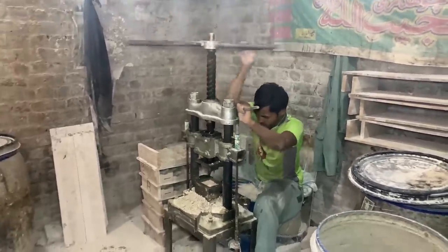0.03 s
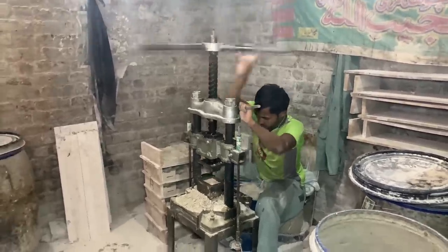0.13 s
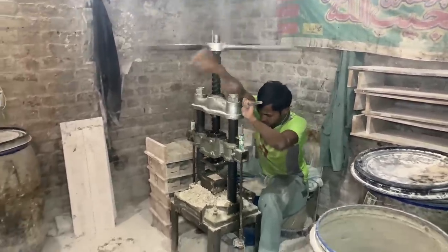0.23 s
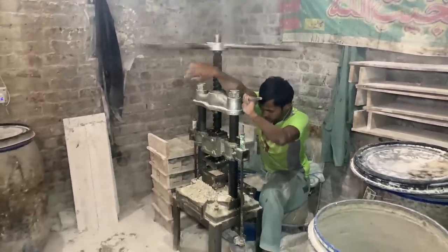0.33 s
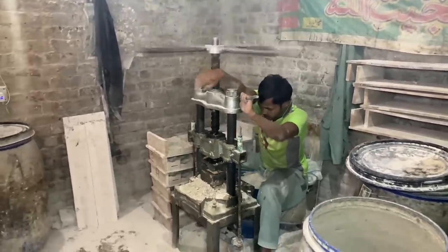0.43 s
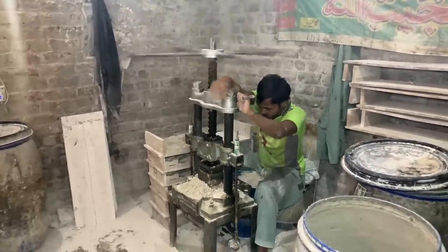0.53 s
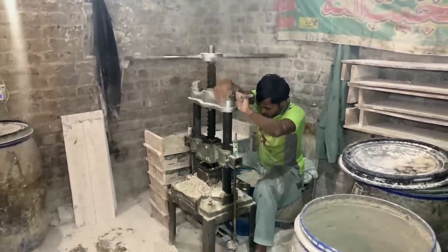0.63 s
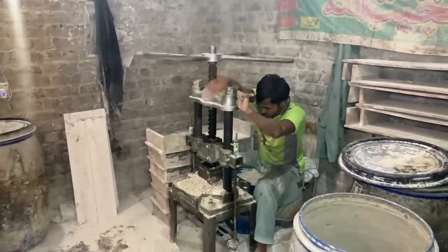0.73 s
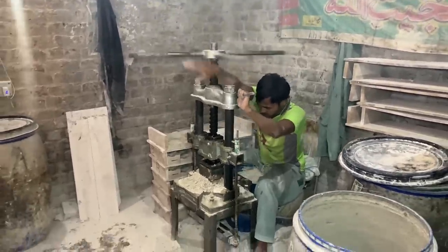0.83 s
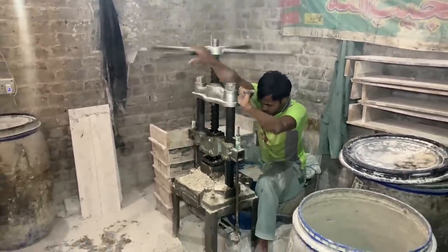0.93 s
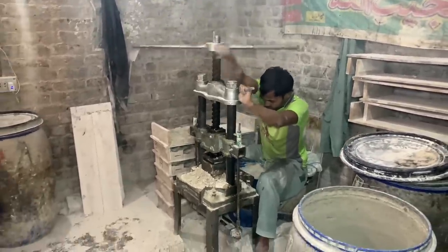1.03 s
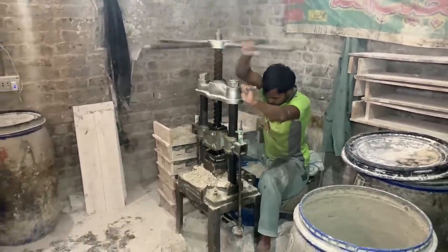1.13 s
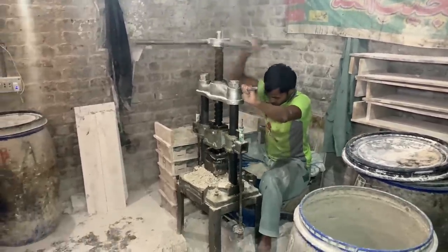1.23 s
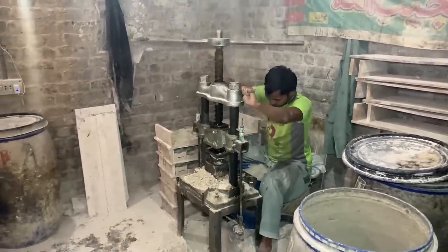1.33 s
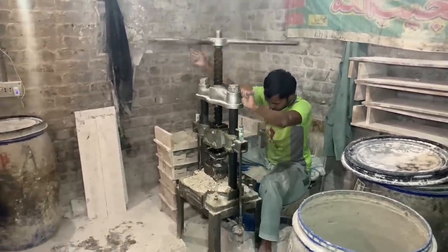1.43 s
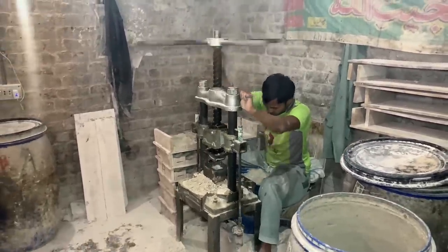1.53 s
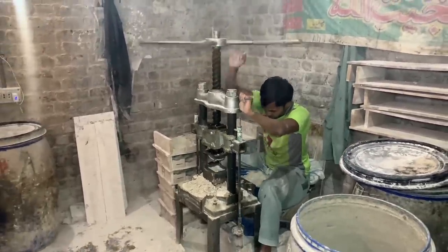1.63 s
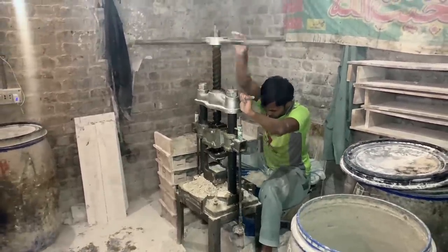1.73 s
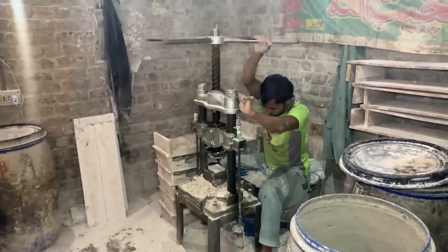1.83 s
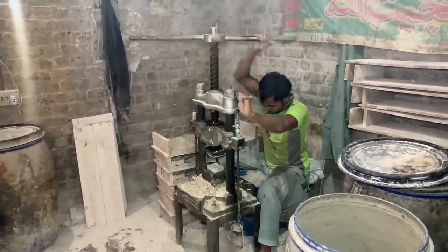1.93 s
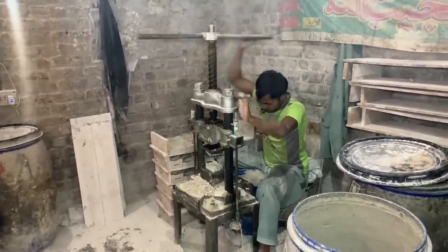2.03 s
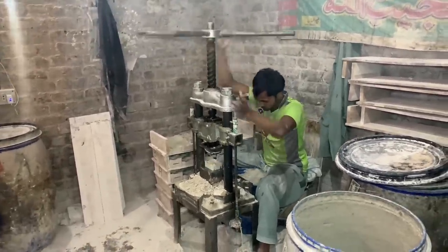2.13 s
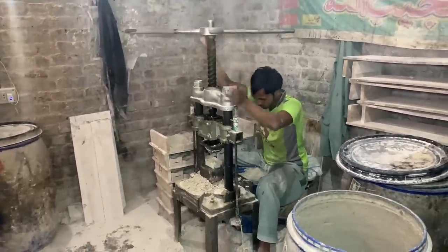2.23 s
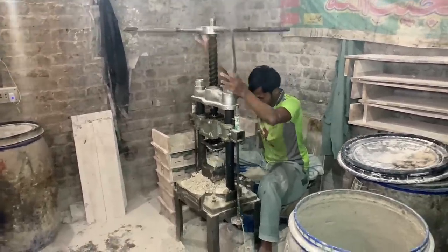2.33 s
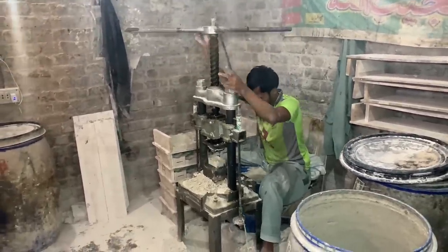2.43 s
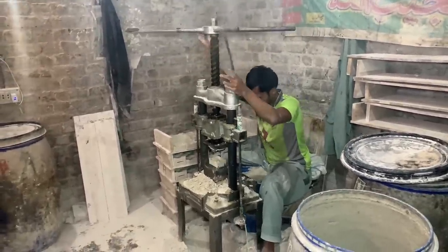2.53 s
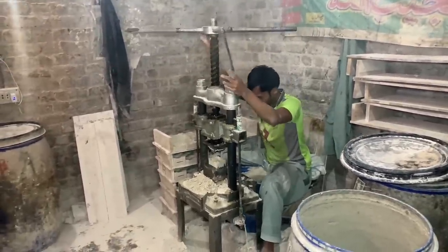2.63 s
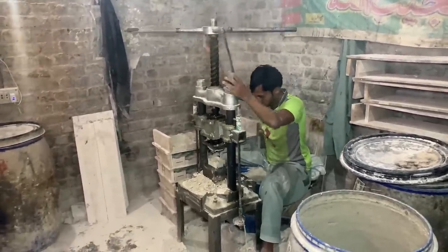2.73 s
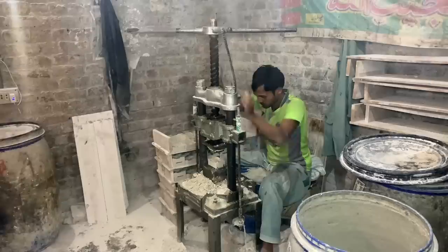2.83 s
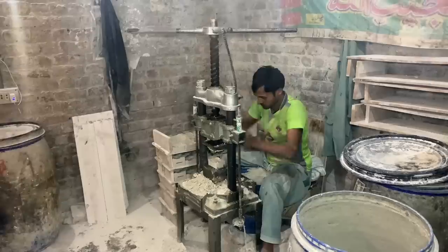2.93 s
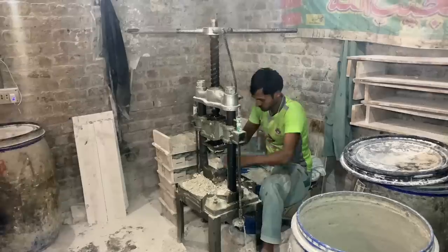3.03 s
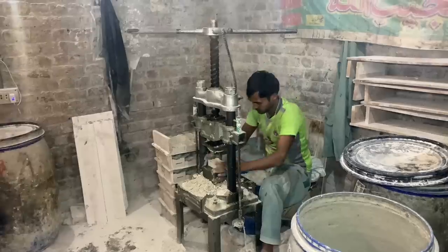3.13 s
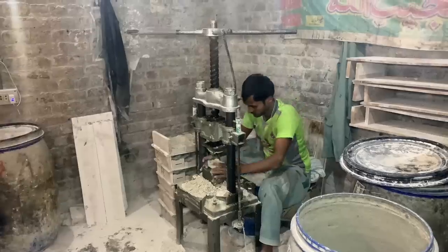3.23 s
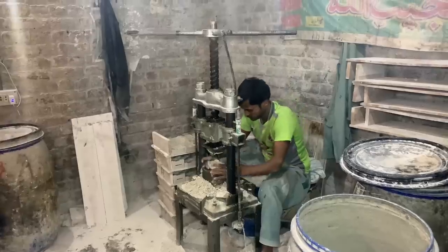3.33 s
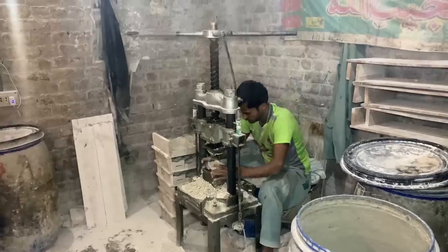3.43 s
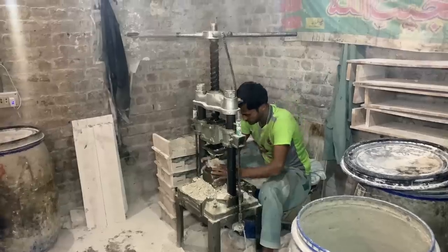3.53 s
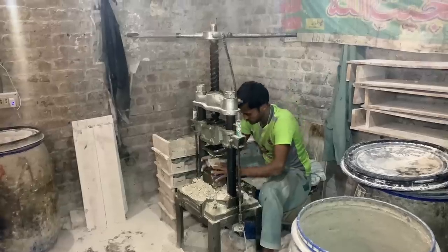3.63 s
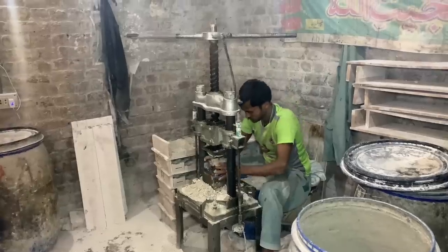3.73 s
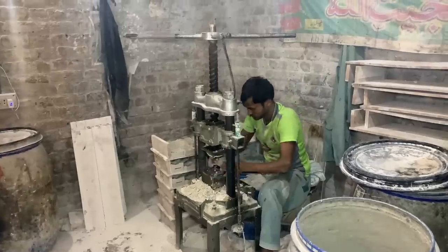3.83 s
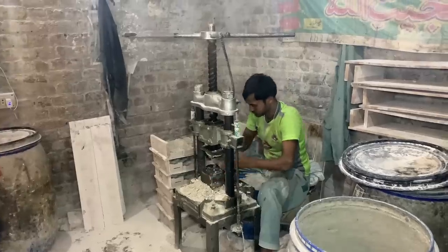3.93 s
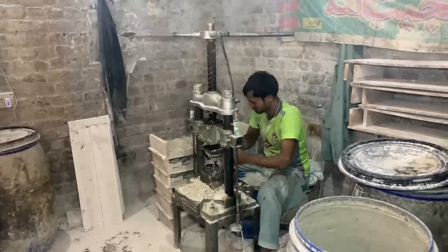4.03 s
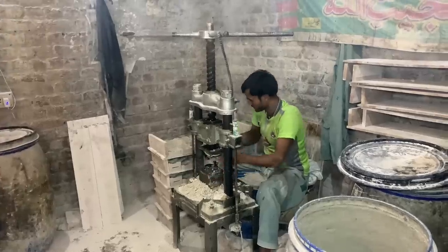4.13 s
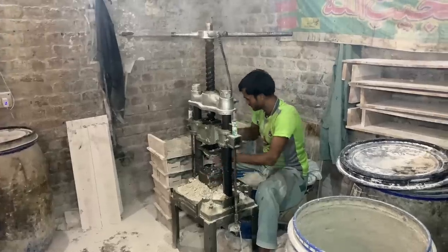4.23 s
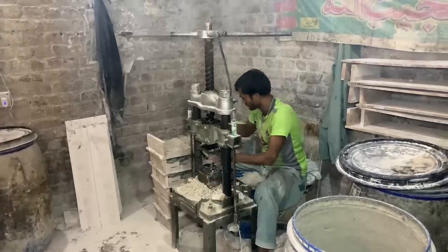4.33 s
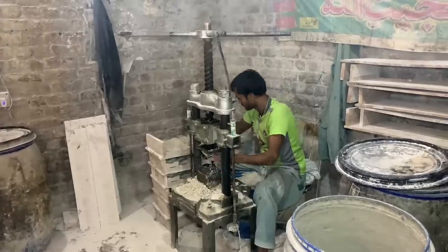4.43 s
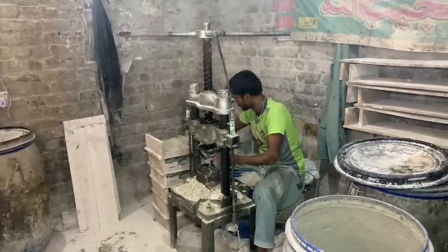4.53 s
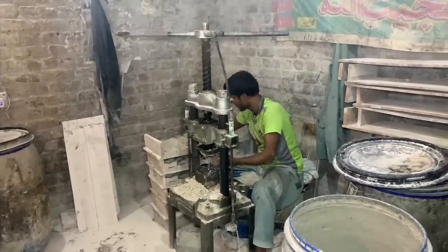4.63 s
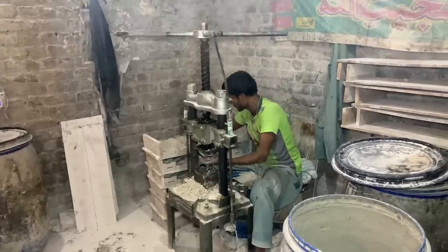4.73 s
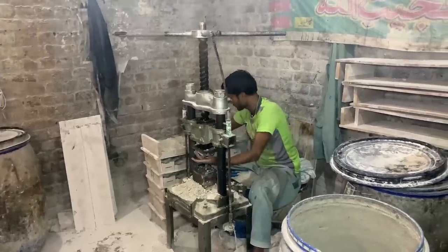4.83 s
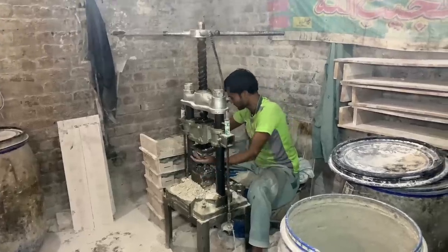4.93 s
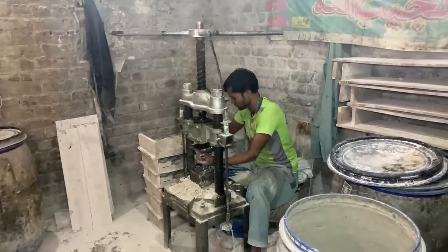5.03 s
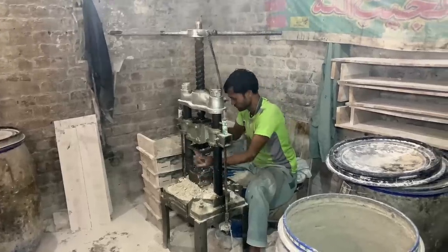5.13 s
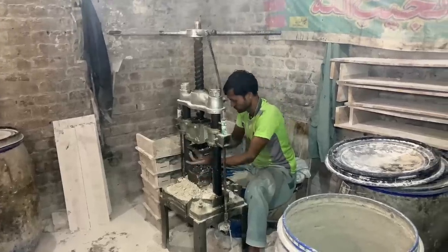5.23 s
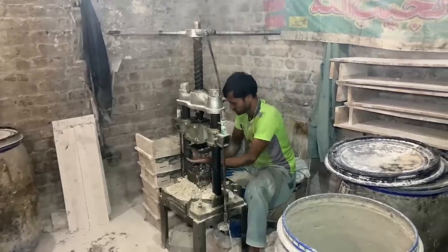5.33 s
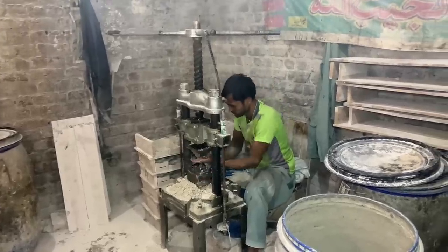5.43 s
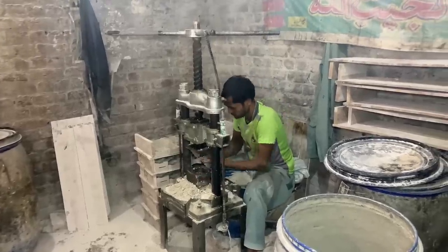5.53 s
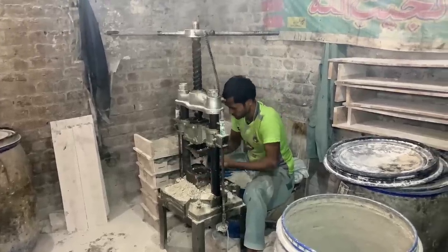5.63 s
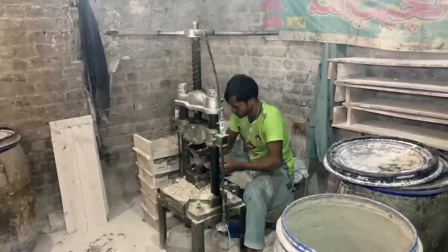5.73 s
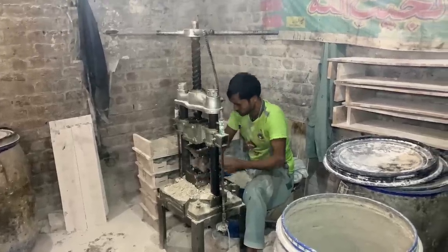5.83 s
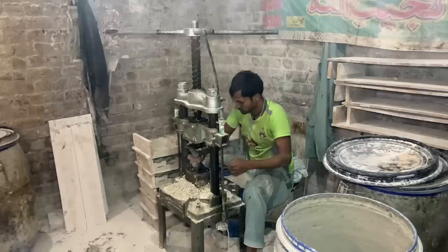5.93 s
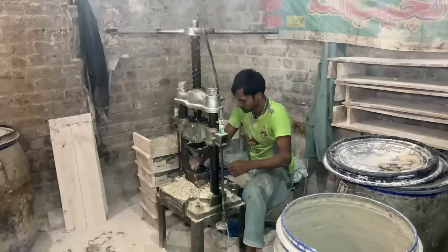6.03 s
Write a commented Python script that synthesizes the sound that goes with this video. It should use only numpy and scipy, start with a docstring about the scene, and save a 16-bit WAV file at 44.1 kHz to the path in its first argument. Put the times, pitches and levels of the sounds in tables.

```python
"""Small brick workshop with a hand screw press: the ram slams down and rattles in its frame, a steel stay rod
clinks against the fly bar, a second, duller knock shakes the bench, and handled steel parts jingle and clank.
Taps, scuffs, squeaks and rattles fall around them, over the rumble and hum of the shop.
Blows are sums of decaying modes and shaped noise bursts with a reverberant tail; the shop is filtered noise."""
import sys
import numpy as np
from scipy import signal
from scipy.fft import rfft, irfft, next_fast_len
from scipy.io import wavfile
from scipy.ndimage import map_coordinates

SR = 44100
rng = np.random.default_rng(int(sys.argv[2]) if len(sys.argv) > 2 else 0)


def wav_out(sig):
    """Save sig, one row per channel (or a flat mono array), as 16-bit PCM at SR to the path in sys.argv[1]."""
    wavfile.write(sys.argv[1], SR, np.round(np.clip(np.atleast_2d(sig).T, -1, 1) * 32767).astype(np.int16))


N = 268877
T = np.arange(SR * 3 // 4) / SR  # time axis of one blow, s


def amp(db):
    """Amplitude factor of a level in dB."""
    return 10 ** (np.asarray(db) / 20)


def unit(x):
    """Rms 1."""
    return x / np.sqrt(np.mean(x ** 2) + 1e-20)


def onset_unit(x, size=900):
    """Rms 1 over the first 20 ms."""
    return x / np.sqrt(np.mean(x[..., :size] ** 2) + 1e-20)


def along(points, hz):
    """Interpolate (Hz, value) points on a log frequency axis."""
    f, v = np.transpose(points)
    return np.interp(np.log(hz + 1), np.log(f + 1), v)


def wobble(rate, n=N):
    """A smooth random curve, rate knots a second."""
    knots = rng.standard_normal(int(n * rate / SR) + 4)
    return map_coordinates(knots, [np.arange(n) * rate / SR])


def filtered(x, response, size=8192):
    """x times a response of frequency."""
    n = x.shape[-1]
    m = next_fast_len(n + size)
    return irfft(rfft(x, m) * response(np.fft.rfftfreq(m, 1 / SR)), m)[..., :n]


def shaped(x, colour_db):
    """x through a causal, minimum-phase filter of the given gain, so nothing sounds before a blow."""
    n = x.shape[-1]
    m = 2 * next_fast_len(n // 2 + 2048)
    gain_db = np.maximum(colour_db(np.fft.rfftfreq(m, 1 / SR)), -120)
    cepstrum = irfft(np.log(amp(gain_db)))
    return irfft(rfft(x, m) * np.exp(2 * rfft(cepstrum[:m // 2], m)))[..., :n]


def add(track, s, sound):
    """Mix a sound in at time s."""
    part = track[:, round(s * SR):][:, :sound.shape[-1]]
    part += sound[..., :part.shape[1]]


def diffuse(n, colour_db, alike=None):
    """Stereo noise of rms 1 whose left-right correlation follows frequency."""
    if alike is None:
        # Each row: frequency in Hz, left-right correlation.
        alike = [(60, 0.96), (130, 0.95), (280, 0.96), (620, 0.2), (1100, 0.6), (1700, -0.54),
                 (3000, -0.0096), (14000, 0.19)]

    def mid_side(hz):
        """Mid and side gains that give the correlation."""
        turn = np.arccos(np.clip(along(alike, hz), -1, 1)) / 2
        return amp(colour_db(hz)) * [np.cos(turn), np.sin(turn)]

    mid, side = filtered(rng.standard_normal((2, n)), mid_side)
    return unit(np.array([mid + side, mid - side]))


def resonances(peaks, hz):
    """Gain in dB of a set of (Hz, width Hz, dB) peaks."""
    return 20 * np.log10(sum(amp(db) / (1 + (2 * (hz - c) / w) ** 2) for c, w, db in peaks))


def burst(colour_db, t60):
    """The dense, quickly dying modes of a struck part, as shaped noise."""
    return onset_unit(shaped(diffuse(len(T), np.zeros_like) * amp(-60 * T / t60), colour_db))


def note(hz, t60):
    """One clear mode dying away."""
    return np.sin(2 * np.pi * hz * T) * amp(-60 * T / t60) * (1 - np.exp(-T / 0.00066))


def ring(modes, scatter_db, attack_s, detune=0):
    """The clear modes of a part, at new strengths for every blow; load shifts a loose part's pitches a little."""
    hz, db, t60 = np.transpose(modes)[:, :, None]
    size = amp(db + scatter_db * rng.standard_normal(hz.shape))
    hz = hz * (1 + detune * rng.standard_normal(hz.shape))
    tones = size * np.exp(-np.log(1000) * T / t60) * np.sin(2 * np.pi * hz * T)
    return onset_unit(tones.sum(axis=0) * (1 - np.exp(-T / attack_s)))


def in_room(x, wet_db):
    """A sound with its answer from the brick walls, a noise tail whose treble dies first."""
    # Each row: frequency in Hz, t60 in s.
    walls = [(80, 1.0), (300, 1), (1200, 0.56), (4000, 0.53), (9000, 0.41), (14000, 0.19)]
    n = len(T)
    hz, t, z = signal.stft(diffuse(n, np.zeros_like), SR, nperseg=256)
    decay = amp(-60 * t / along(walls, hz)[:, None])
    tail = signal.istft(z * decay, SR, nperseg=256)[1][:, :n]
    tail = tail * (1 - np.exp(-T / 0.0013))
    tail = tail / np.linalg.norm(tail[0])
    return x + amp(wet_db) * signal.fftconvolve(np.atleast_2d(x), tail, axes=1)[:, :n]


def shop(rumble_db, air_db, drone_db):
    """Machines further off to the left: a restless rumble with a droning band, and a soft air above it."""
    # Each row: frequency in Hz, density in dB per Hz.
    shop_spectrum = [(25, -21), (45, -17.5), (65, -5.5), (120, -1), (185, -8.5), (230, -1.5), (380, -7.5),
                     (550, -9), (1000, -15), (2000, -25), (3200, -34.5), (5000, -47), (6500, -51.5),
                     (7600, -66.5), (8400, -52), (9600, -64), (14500, -69)]
    # Each row: centre in Hz, width in Hz, peak in dB.
    drone_peaks = [(217, 90, 0)]
    # Each row: frequency in Hz, left-right correlation.
    shop_alike = [(60, 0.99), (150, 1), (370, 0.94), (910, -0.2), (2260, 0.2), (5610, 1), (13900, 0.9)]
    # Three stretches: before, between and after the knocks. Each row: time in seconds, air level in dB before air_db.
    air_stretches = [
        [(0.0, -37.5), (0.508, -42), (0.62, -38)],
        [(1.15, -40), (3.89, -40), (3.95, -38.5)],
        [(4.6, -39.5), (5.502, -41), (5.95, -39.5)],
    ]
    split_hz, left_lead_s = 500, 0.00043

    def low_db(hz):
        return along(shop_spectrum, hz) - 10 * np.log10(1 + (hz / split_hz) ** 4)

    def high_db(hz):
        return along(shop_spectrum, hz) - 10 * np.log10(1 + (split_hz / (hz + 1)) ** 4)

    air = np.interp(np.arange(N) / SR, *np.vstack(air_stretches).T)
    low = diffuse(N, low_db, shop_alike)
    high = diffuse(N, high_db, shop_alike)
    drone = diffuse(N, lambda hz: resonances(drone_peaks, hz), shop_alike)
    rumble = amp(rumble_db) * low + amp(drone_db) * drone
    noise = amp(1.9 * wobble(12)) * rumble + amp(air + air_db + 0.99 * wobble(20.89)) * high
    return filtered(noise, lambda hz: np.exp(1j * np.pi * left_lead_s * np.outer([1, -1], hz)))


def hum(level_db, centre_hz, half_width_hz, waver_db):
    """A narrow, deep band of noise that wavers and now and then swells."""
    # Each row: time of the top in seconds, rise in dB, half length in s.
    swell_rows = [(1.6, 10.5, 0.071), (2.3, 9, 0.045), (2.947, 3, .2), (5.7, 11.5, 0.36)]
    t = np.arange(N) / SR
    swell = sum(db * np.exp(-((t - s) / length) ** 2) for s, db, length in swell_rows)
    band = diffuse(N, lambda hz: -20 * np.log10(1 + ((hz - centre_hz) / half_width_hz) ** 4))
    return amp(level_db + swell + waver_db * wobble(3.95)) * band


def friction():
    """Hands and parts on steel: gritty noise scuffs, and thin wavering tones where dry steel slides."""
    # Each row: start in seconds, level in dB, length in s.
    scuff_rows = [(0.0, -43.5, 0.019), (0.163, -43.5, 0.066), (1.465, -47.5, 0.071), (4.96, -48, 0.08),
                  (5.115, -49, 0.079), (5.409, -51.5, 0.11)]
    # Each row: start in seconds, level in dB, pitch in Hz, length in s.
    squeak_rows = [(0.942, -64.5, 6070, 0.1), (4.523, -65.5, 6320, .06), (4.684, -63, 5580, 0.063)]
    # Each row: frequency in Hz, density in dB per Hz.
    scrape_spectrum = [(800, 13.5), (2500, 12.5), (4500, 4.5), (7000, -3.5), (10000, -7), (11500, -20),
                       (14000, -15)]
    out, n = np.zeros((2, N)), len(T)

    def stroke(length):
        """Envelope of one slide."""
        return np.sqrt(np.abs(np.sin(np.pi * np.minimum(T / length, 1))))

    for s, db, length in scuff_rows:
        grit = unit(diffuse(n, lambda hz: along(scrape_spectrum, hz)) * amp(2.6 * wobble(150, n)))
        add(out, s, amp(db) * in_room(grit * stroke(length), wet_db=-0.5))
    for s, db, pitch_hz, length in squeak_rows:
        phase = 2 * np.pi * np.cumsum(pitch_hz * (1 + 0.02 * wobble(500, n))) / SR
        add(out, s, amp(db) * in_room(np.sin(phase) * stroke(length), wet_db=-0.5))
    return out


def taps():
    """Loose parts knock in one broad, damped resonance; brief clear notes ring out, among them the low note of
    the ram's main blow; a small steel part clicks in several."""
    # Light taps. Each row: start in seconds, level in dB, pitch in Hz, width in octaves, t60 in s.
    tap_rows = [(0.698, -18, 316, 0.29, .12), (0.708, -30, 3840, 0.082, 0.073),
                (0.785, -38.5, 4640, 0.48, 0.19), (1.151, -48.5, 1900, .6, .1), (1.15, -33, 120, .5, 0.18),
                (1.357, -27.5, 250, 0.7, 0.18), (1.352, -40, 1290, 0.32, 0.11), (1.378, -35, 620, 0.64, .2),
                (1.487, -36.5, 1180, 0.5, .2), (1.53, -41, 1360, 0.62, 0.085),
                (1.522, -31.5, 241, 0.97, 0.25), (1.602, -32, 84.6, 0.47, .15),
                (2.72, -36.5, 1130, 0.75, 0.25), (3.09, -33, 202, 1.25, 0.18), (2.618, -37, 1980, .5, 0.13),
                (2.834, -42.5, 3630, .9, .07), (3.354, -54.5, 3520, 0.71, 0.23),
                (3.996, -42.5, 2620, 0.84, 0.4), (4.081, -37, 3050, 0.36, 0.035),
                (4.113, -28, 1300, 0.27, 0.061), (4.157, -41, 2500, 0.12, .06),
                (4.226, -35, 840, 0.65, 0.14), (5.581, -37.5, 1180, 0.65, 0.14),
                (5.969, -33.5, 2300, .4, 0.081), (6.081, -28, 202, 1.25, .2)]
    # Brief clear notes, one mode each, among them the ram's low ring as it lands. Each row: start in seconds,
    # level in dB, pitch in Hz, t60 in s.
    tock_rows = [(0.682, -31.5, 3280, 0.04), (0.686, -28, 1980, 0.065), (0.695, -25.5, 3116, .035),
                 (0.696, -11.5, 202, 0.078), (0.785, -32, 1115, 0.27), (0.804, -30.5, 1686, 0.11),
                 (1.505, -32, 1150, 0.075), (4.05, -28.5, 1015, 0.13), (2.616, -37.5, 6080, 0.12),
                 (2.912, -43, 3720, 0.093), (5.14, -52, 2700, 0.13), (5.491, -41.5, 3850, 0.067),
                 (5.969, -30, 8830, .025)]
    # The small part is set down. Each row: start in seconds, level in dB.
    click_rows = [(5.491, -32)]
    # Its clusters of modes. Each row: centre in Hz, width in Hz, peak in dB.
    small_part = [(1210, 300, 4), (2270, 710, -6.5), (3390, 87, -2), (3820, 460, -8), (5400, 840, -25)]
    out = np.zeros((2, N))
    for s, db, pitch_hz, octaves, t60 in tap_rows:
        def resonance_db(hz):
            return -18 * np.log10(1 + (np.log2((hz + 1) / pitch_hz) / octaves) ** 4)
        knock = burst(resonance_db, t60)
        add(out, s, amp(db) * onset_unit(in_room(knock, wet_db=-7.0)))
    for s, db, pitch_hz, t60 in tock_rows:
        add(out, s, amp(db) * onset_unit(in_room(note(pitch_hz, t60), wet_db=-6.5)))
    for s, db in click_rows:
        click = burst(lambda hz: resonances(small_part, hz), t60=0.092)
        add(out, s, amp(db) * onset_unit(in_room(click, wet_db=-10.5)))
    return out


def rattles(per_s, size_db, wet_db, click_t60, count=56, order=9):
    """Loose parts on the bench chatter in small, uneven clicks that die away; each rings a few modes of its own."""
    # Each row: start in seconds, level in dB, t60 in s, brightness in dB per octave.
    rattle_rows = [(0.715, -35, 0.24, 4), (0.784, -32.5, 0.19, 3), (0.83, -37.5, 0.12, 0.5),
                   (2.311, -39.5, 0.31, 3.5), (2.614, -41, 0.23, 5), (2.834, -42.5, 0.67, 4),
                   (4.055, -34, .3, 0), (4.13, -38, 0.58, -1), (5.67, -55.5, .5, 10.5),
                   (5.972, -35, 0.55, 4)]
    # Each row: frequency in Hz, gain in dB.
    rattle_colour = [(300, -20.5), (900, 0.5), (2000, -1), (3500, -17), (5000, -20), (9000, -22.5),
                     (14000, -38.5)]
    out, t = np.zeros((2, N)), T[:len(T) // 20]
    for s, db, t60, tilt in rattle_rows:
        clicks = np.zeros((2, len(T)))
        gaps = rng.uniform(.3, 1.7, count) / per_s
        for at in np.cumsum(gaps) - gaps[0]:
            # one mode in each of equal log bands, 500 Hz to 14 kHz
            mode_hz = 500 * 28 ** ((np.arange(order) + rng.random(order)) / order)
            click_size = amp(size_db * rng.uniform(-1.1, 1))
            sizes = click_size * np.sqrt(mode_hz) * rng.choice([-1, 1], (2, order))
            tones = sizes @ np.sin(2 * np.pi * np.outer(mode_hz, t))
            add(clicks, at, tones * amp(-60 * t / click_t60))
        chatter = unit(shaped(clicks, lambda hz: along(rattle_colour, hz) + tilt * np.log2(1 + hz / 500)))
        add(out, s, amp(db) * in_room(chatter * amp(-60 * T / t60), wet_db))
    return out


def touching_twice(hits, gap_s, loss_db):
    """A hand-held part springs back and touches once more, lightly."""
    return [(s + k * gap_s, db - k * loss_db, *rest) for s, db, *rest in hits for k in (0, 1)]


def clinks(contacts, modes, level_db, tick_db, half_width_hz_at_4k, valley_db, low_t60, high_t60, wet_db,
           detune, chatter_db, lead_t60, clear_db, clear_t60, rise_s):
    """Steel on steel: a tick, then clusters of modes weighted by where the blow lands; a separate mode leads."""
    # Each row: frequency in Hz, density in dB per Hz.
    tick_spectrum = [(500, 11.5), (1500, 2), (3000, 4.5), (6000, -2), (9000, 0), (11000, -7),
                     (13000, -39.5), (14500, -14.5)]
    out = np.zeros((2, N))
    rest_hz, at_first, at_second = np.transpose(modes)
    is_low = rest_hz < 5300
    for s, ring_db, treble_db, place, lead_hz, lead_db in contacts:
        place_db = at_first + np.clip(place, 0, 1) * (at_second - at_first)
        strength = amp(place_db + 2.3 * rng.standard_normal(len(modes)))
        # the grip of the hand shifts the modes a little from blow to blow
        centre = rest_hz * (1 + detune * rng.standard_normal(len(modes)))
        # the parts chatter against each other before they come free
        chatter = amp(chatter_db * wobble(343, len(T)))
        # light contacts slide in softly, hard ones start at once
        rise = 1 - np.exp(-T / (rise_s * amp(-1.5 * (ring_db + 45.5))))
        # a harder blow also wakes the many weak modes between the clusters
        skirt = amp(valley_db + 0.14 * (ring_db + 42.5))
        for part, db, t60 in (is_low, ring_db, low_t60), (~is_low, ring_db + treble_db, high_t60):
            part_hz = centre[part, None]

            def clusters(hz):
                """Narrow peaks, each on a weak, broad skirt."""
                off = ((hz - part_hz) / (half_width_hz_at_4k * np.sqrt(part_hz / 4000))) ** 2
                power = 1 / (1 + off) ** 2 + skirt ** 2 / (1 + off / 60) ** 2
                return 10 * np.log10(strength[part] ** 2 @ power)

            signs = rng.choice([-1, 1], (2, part.sum()))
            clear = onset_unit(strength[part] * signs @ note(part_hz, clear_t60))
            metal = (burst(clusters, t60) * chatter + amp(clear_db) * clear) * rise
            add(out, s, amp(db + level_db) * onset_unit(in_room(metal, wet_db)))
        lead = note(lead_hz, lead_t60) * rise * chatter
        add(out, s, amp(ring_db + lead_db) * onset_unit(in_room(lead, wet_db=-5.5)))
        tick = burst(lambda hz: along(tick_spectrum, hz), t60=0.016)
        add(out, s, amp(ring_db + treble_db / 2 + tick_db) * onset_unit(in_room(tick, wet_db=7.5)))
    return out


def handled_steel():
    """Handled steel parts jingle and end in a hard clank: broad clusters of modes, weighted by place 0 to 1."""
    # Each row: start in seconds, ring in dB before level_db, treble in dB over the ring,
    # place from 0 to 1, leading mode in Hz, its level in dB against the tabled ring.
    steel_hits = [(2.8, -48, 1.5, 0.43, 2795, 2.5), (2.834, -46.5, 3.5, 0.41, 4230, -4),
                  (2.857, -53.5, -1, 0, 5550, 11), (2.883, -52.5, -1.5, 0.51, 7050, 1),
                  (2.911, -45.5, -6, 0, 3714, 3.5), (2.948, -57, -7, 0, 7080, 1),
                  (5.607, -53, -7, 0.35, 3070, 4), (5.631, -48.5, -1.5, 0.34, 8560, -2),
                  (5.64, -52, 3.5, 0.2, 7050, -1), (5.672, -41, -0.5, 0.047, 4200, -6.5),
                  (5.696, -51.5, 4, 0.081, 8870, 1), (5.838, -48.5, 3.5, 0.53, 3560, -0.5),
                  (5.848, -51.5, 3.5, 0.52, 2800, 4), (5.969, -32.5, 2, 0.9, 8350, -8),
                  (5.991, -39.5, -2, 1, 4020, 0), (6.022, -43, -1, 0.91, 5870, 2),
                  (6.058, -46, -7, 0.93, 3620, 3)]
    # Each row: mode in Hz, level in dB struck at place 0, level in dB struck at place 1.
    part_modes = [(1957, -5.5, 6), (2360, -8, -1.5), (2735, -3.5, -4.5), (3070, -3, -7), (3630, -1, 2),
                  (3880, -7, 2), (4180, -1.5, 0), (4446, -11, -6.5), (5640, 4.5, -4.5), (5900, -16, -1.5),
                  (6100, -10, 1), (6920, 0, -13), (7180, -4, -14), (8210, -15, -2), (8300, -10, -3),
                  (8530, 2.5, -8.5), (8860, 0, -8.5), (10580, -4.5, -1), (12600, -8, -1.5),
                  (14010, -30, -7)]
    return clinks(steel_hits, part_modes, level_db=1.0, tick_db=2.5, half_width_hz_at_4k=56, valley_db=-20.5,
                  low_t60=0.21, high_t60=0.15, wet_db=1.0, detune=0.004, chatter_db=4.0, lead_t60=0.14,
                  clear_db=-1.5, clear_t60=0.15, rise_s=0.00081)


def stay_rod():
    """The stay rod clinks on the fly bar, each hit touching twice; place along the rod weights its modes."""
    # Each row: start in seconds, ring in dB before level_db, treble in dB over the ring,
    # place from tip 0 to shank 1, leading mode in Hz, its level in dB against the tabled ring.
    rod_hits = [(2.229, -38.5, -8, 0.69, 6430, -11), (2.307, -33.5, -4, 0.26, 3740, -5.5),
                (2.313, -33.5, -6, 0.39, 3656, -6), (2.323, -40, -3, 0.024, 2740, -4),
                (2.354, -43, -0.5, 0.034, 3390, 2), (2.451, -47, -8.5, 0.59, 3400, -9),
                (2.523, -38, -7, 0.19, 2750, -8.5), (2.546, -51.5, -7, 0, 2450, -2),
                (2.61, -33, 1, 0.99, 3850, -7), (2.617, -32.5, -3, 0.81, 3950, -2),
                (2.633, -37.5, -5.5, 1, 2090, -5), (2.668, -48.5, -8.5, 0.88, 3700, 7.5)]
    # Each row: mode in Hz, level in dB struck at place 0, level in dB struck at place 1.
    rod_modes = [(1794, 4, 2.5), (2030, -10, 1), (2356, 0.5, -2), (2525, 7.5, -8), (2740, 4.5, -11),
                 (3060, 5, -5), (3440, 2, -1), (3696, -16, 8), (4060, -10, 2.5), (4540, -8, -11),
                 (4920, -2, -20), (5760, -1, 5), (5980, -8, 2.5), (6280, 1, -4), (7340, -9, -6),
                 (7670, 0.5, -14), (8340, -2, -0.5), (8860, -9, -2.5), (9150, -11, -2.5), (10500, 1, -1.5),
                 (11000, -9.5, -5), (12450, -17, -6), (12850, -3, -4.5), (13970, -6, -19.5)]
    return clinks(touching_twice(rod_hits, gap_s=0.008, loss_db=2.5), rod_modes, level_db=-1.6, tick_db=-4.5,
                  half_width_hz_at_4k=32, valley_db=-11.0, low_t60=0.1, high_t60=0.13, wet_db=-7.5,
                  detune=0.0065, chatter_db=2.0, lead_t60=0.088, clear_db=-13, clear_t60=0.18, rise_s=0.0025)


def rattling(contacts, gap_s, loss_db, crack_loss_db, count):
    """The last contact repeats as the part rocks to rest, each time weaker."""
    s, clang, thud, crack = contacts[-1]
    repeats = [(s + k * gap_s, clang - k * loss_db, thud - k * loss_db, crack - k * crack_loss_db)
               for k in range(1, count + 1)]
    return list(contacts) + repeats


def knocks(contacts, body, metal, body_db, thud_db, clang_db, steel_db, clang_t60, rise_s, wet_db,
           boom_wet_db, tilt_db, tilt_per_db):
    """Each heavy contact cracks, clangs in the steel and sets the mass under it booming."""
    # Spectra. Each row: frequency in Hz, density in dB per Hz.
    thud_spectrum = [(20, -46.5), (45, -5), (90, -1.5), (200, -1.5), (380, -7), (500, -16.5), (680, -17.5),
                     (900, -27), (2000, -58.5)]
    clang_spectrum = [(200, -26), (500, 5), (800, 4), (1200, 4.5), (1900, -1.5), (2500, -1.5), (3200, -6.5),
                      (4300, -11.5), (5700, -30.5), (7000, -38.5), (9000, -50), (14000, -64)]
    crack_spectrum = [(1500, -9.5), (4000, 7.5), (6000, 3.5), (7300, -6), (8600, -1), (10500, -5),
                      (11800, -11), (13000, -9.5), (14500, -22)]
    out = np.zeros((2, N))
    for s, clang, thud, crack in contacts:
        push = burst(lambda hz: along(thud_spectrum, hz), t60=0.038)
        push = onset_unit(in_room(push, boom_wet_db))
        boom = amp(body_db) * ring(body, scatter_db=1.5, attack_s=0.0073) + amp(thud_db) * push
        steel = burst(lambda hz: along(clang_spectrum, hz), clang_t60)
        steel = steel + amp(steel_db) * ring(metal, scatter_db=2.0, attack_s=0.0006, detune=0.0061)
        # loose parts grind against each other during the blow
        steel = steel * amp(4.8 * wobble(223, len(T))) * (1 - np.exp(-T / rise_s))
        # a contact with little mass behind it is shorter and so favours the upper modes (dB per octave)
        brightness = tilt_db + tilt_per_db * (clang - thud)
        steel = shaped(steel, lambda hz: brightness * np.log2(np.clip(hz, 700, 3500) / 1500))
        edge = burst(lambda hz: along(crack_spectrum, hz), t60=0.055) * (1 - np.exp(-T / 0.0012))
        add(out, s, amp(thud) * boom)
        add(out, s, amp(clang + clang_db) * onset_unit(in_room(steel, wet_db)))
        add(out, s, amp(crack) * onset_unit(in_room(edge, wet_db=-2.0)))
    return out


def bench():
    """The duller knock: the bench booms, its steel fittings clang, and the part rocks to rest."""
    # Each row: start in seconds, clang in dB before clang_db, thud in dB, crack in dB.
    bumps = [(4.047, -24.5, -29.5, -52), (4.081, -29, -15.5, -38), (4.099, -31, -10.5, -43),
             (4.123, -34.5, -18.5, -48), (4.159, -30, -24.5, -51), (4.197, -36, -18.5, -51),
             (4.222, -34, -23.5, -59.5)]
    # Modes of the bench, then of its steel fittings. Each row: frequency in Hz, level in dB, t60 in s.
    bench_modes = [(60.4, -5, 0.92), (81.1, 1.5, 0.47), (117.3, -6, 1), (161.6, 0, 0.53), (185, 1, 0.54),
                   (240, -8, 0.26), (325.4, -11.5, 1)]
    fitting_modes = [(717, -1, 0.23), (1050, 1.5, 0.16), (1120, -2.5, .35), (1310, -7, 0.17),
                     (1970, -5, .3), (2130, -2, 0.22), (2436, -3, .22), (2880, -5, 0.34), (3430, -6, 0.2),
                     (3670, -7, 0.2)]
    contacts = rattling(bumps, gap_s=0.044, loss_db=3.5, crack_loss_db=1.5, count=2)
    return knocks(contacts, bench_modes, fitting_modes, body_db=-7.0, thud_db=-6.0, clang_db=-0.5,
                  steel_db=-10.5, clang_t60=0.048, rise_s=0.0033, wet_db=4.5, boom_wet_db=-1.0,
                  tilt_db=-1.2, tilt_per_db=0.2)


def ram():
    """The ram lands and rattles: repeated contacts ring its steel and set the frame booming."""
    # Each row: start in seconds, clang in dB before clang_db, thud in dB, crack in dB.
    landings = [(0.683, -21, -42, -38), (0.692, -15.5, -19.5, -32.5), (0.697, -13.5, -14, -38.5),
                (0.707, -15.5, -20, -41), (0.718, -19.5, -21, -44), (0.751, -31, -19.5, -45),
                (0.785, -24, -15.5, -42), (0.806, -26, -25, -49), (0.829, -27, -14, -54),
                (0.85, -33, -23, -53), (0.922, -42, -22, -68)]
    # Modes of the frame, then of the ram's steel. Each row: frequency in Hz, level in dB, t60 in s.
    frame_modes = [(61.5, -6.5, 1), (101, 0, 0.85), (170.2, 4, 0.7), (202.3, -3, 0.76), (215, 1.5, 0.2),
                   (306, -4, 0.3), (326, -22, 0.51), (402, -8, 0.81)]
    steel_modes = [(933, -9, 0.22), (1108, 1.5, 0.32), (1194, 1.5, 0.3), (1336, -6, 0.2), (1560, -4.5, .25),
                   (1660, 8, 0.12), (1820, 2.5, 0.29), (1868, 13.5, 0.089), (1977, 1.5, 0.18),
                   (2096, 3.5, 0.12), (2380, -4.5, 0.22), (2600, -5, .2), (2775, -4.5, 0.2),
                   (3100, -12, 0.16), (3580, -5.5, 0.2), (3810, 0.5, 0.1), (4000, -9.5, 0.19),
                   (4500, -6.5, .2), (4800, -9, 0.1), (5670, -11, .18)]
    return knocks(landings, frame_modes, steel_modes, body_db=-8.5, thud_db=-4.0, clang_db=-2.0,
                  steel_db=-6.5, clang_t60=0.063, rise_s=0.0014, wet_db=-7.0, boom_wet_db=-3.5,
                  tilt_db=-1.0, tilt_per_db=0.05)


def scene():
    """The shop behind, the parts handled around the press, and the press."""
    floor = shop(rumble_db=-33, air_db=2.0, drone_db=-41.0)
    floor = floor + hum(level_db=-46.5, centre_hz=55.5, half_width_hz=15.6, waver_db=2.0)
    loose = friction() + taps() + rattles(per_s=110, size_db=5.5, wet_db=-5.5, click_t60=.03)
    return floor + loose + handled_steel() + stay_rod() + bench() + ram()


def record(dry):
    """Two microphones of slightly different colour, without the deepest bass; the loudest peaks are rounded off."""
    # Each row: frequency in Hz, left minus right in dB.
    lean = [(60, -2), (200, -1), (700, 0.1), (2500, -1), (5000, -0.6), (8500, -6), (13000, 1)]
    low_cut_hz, top_hz = 36, 14500
    notch_db, notch_hz, notch_width_hz = 12, 11750, 420  # a narrow band of treble is weakened

    def colour(hz):
        return amp(np.outer([.5, -.5], along(lean, hz))) * (1 - 1 / (1 + (hz / low_cut_hz) ** 4))

    heard = filtered(dry, colour)
    heard = filtered(heard, lambda hz: amp(-notch_db * np.exp(-((hz - notch_hz) / notch_width_hz) ** 2)))
    rounded = heard / (1 + np.abs(heard / .96) ** 6) ** (1 / 6)
    return filtered(rounded, lambda hz: hz < top_hz)


dry = scene()
out = record(dry)
wav_out(out)
```